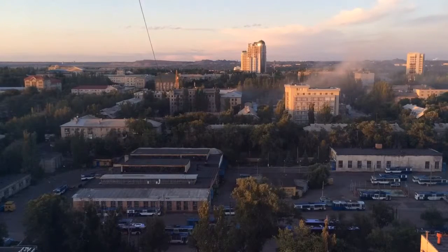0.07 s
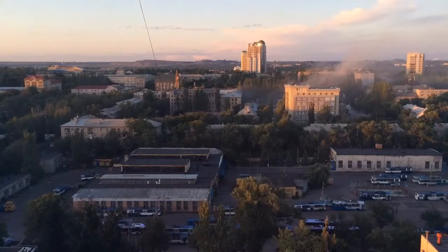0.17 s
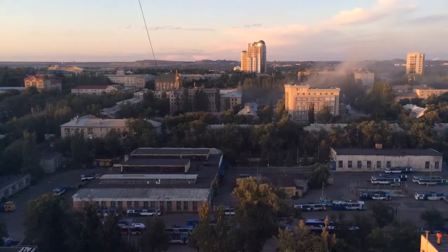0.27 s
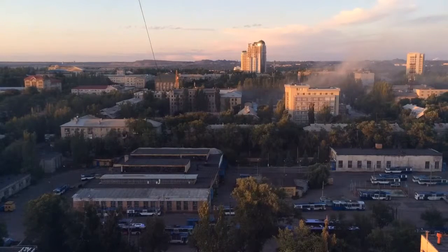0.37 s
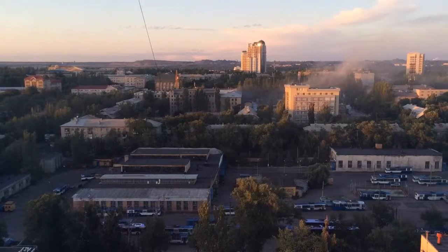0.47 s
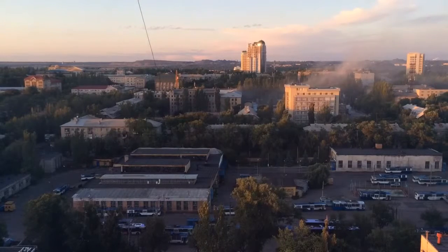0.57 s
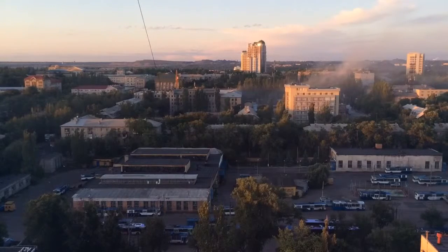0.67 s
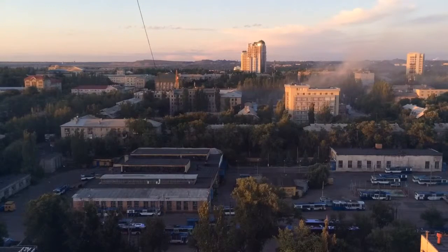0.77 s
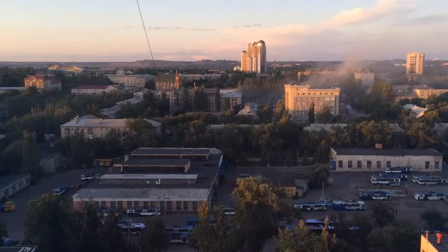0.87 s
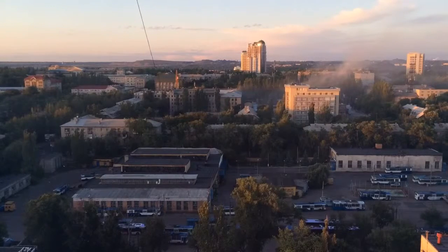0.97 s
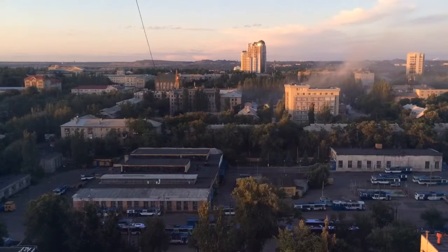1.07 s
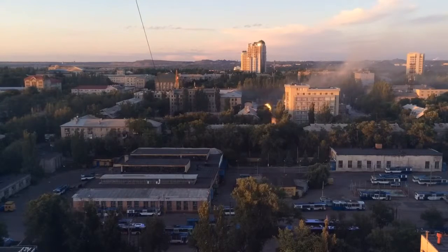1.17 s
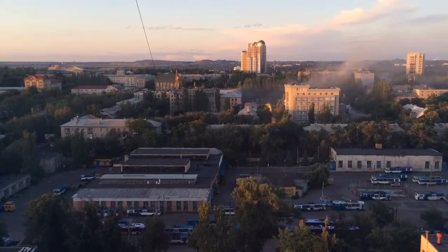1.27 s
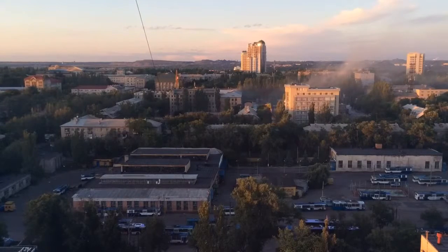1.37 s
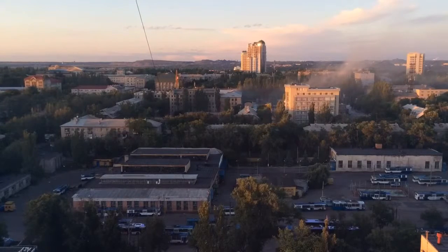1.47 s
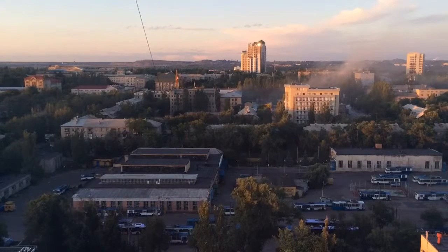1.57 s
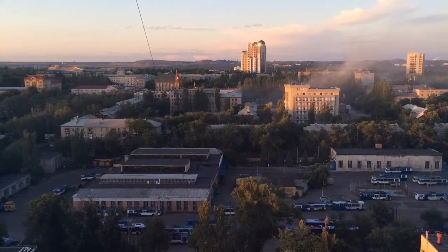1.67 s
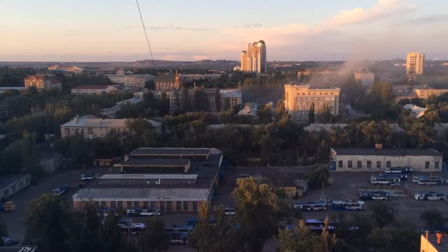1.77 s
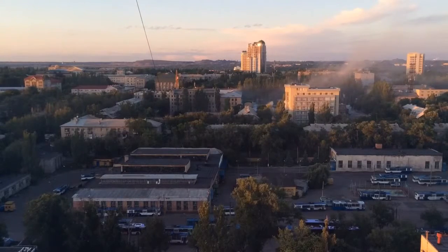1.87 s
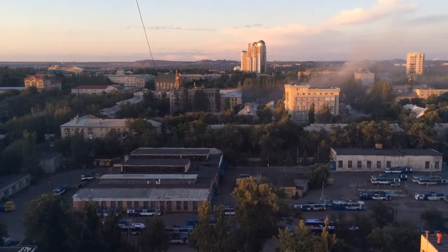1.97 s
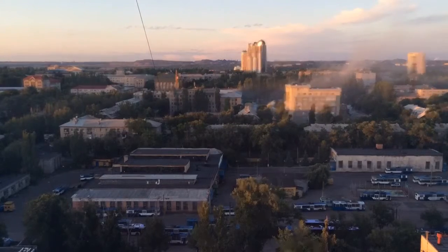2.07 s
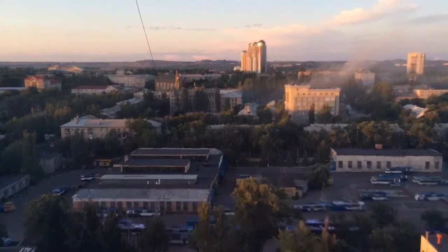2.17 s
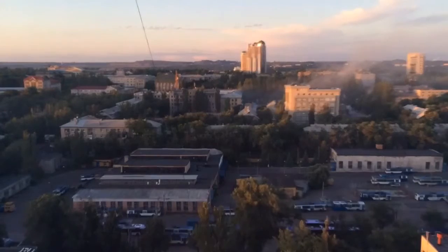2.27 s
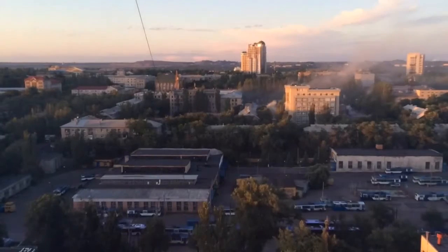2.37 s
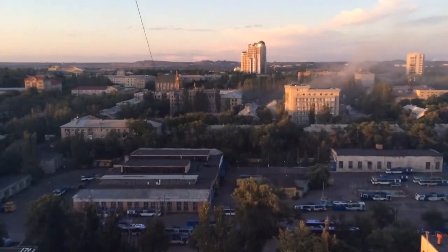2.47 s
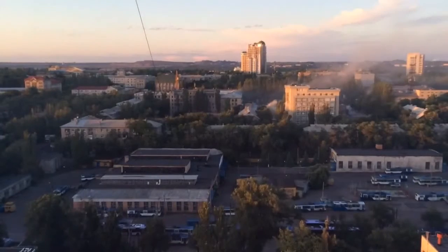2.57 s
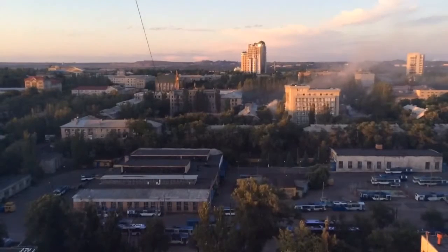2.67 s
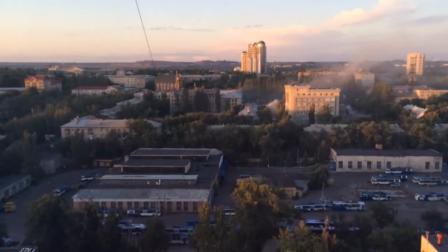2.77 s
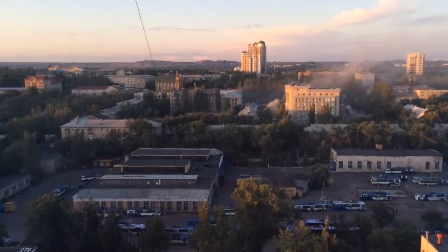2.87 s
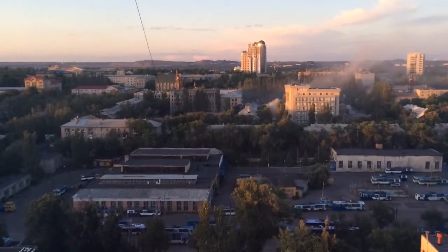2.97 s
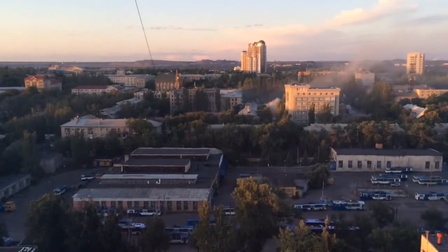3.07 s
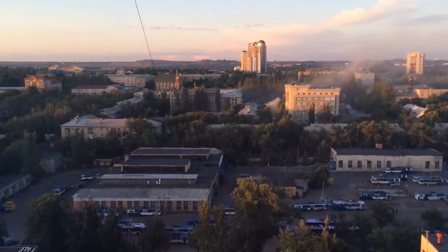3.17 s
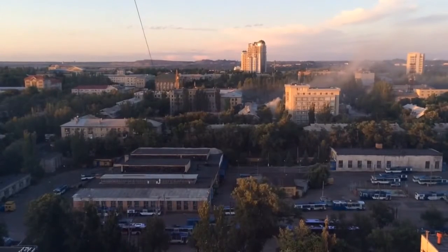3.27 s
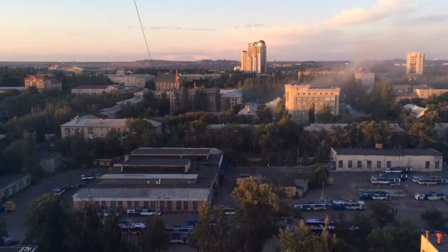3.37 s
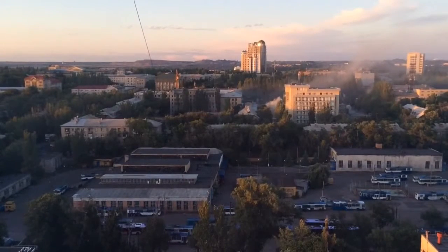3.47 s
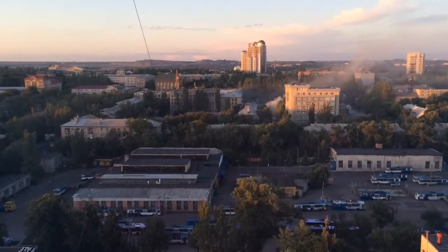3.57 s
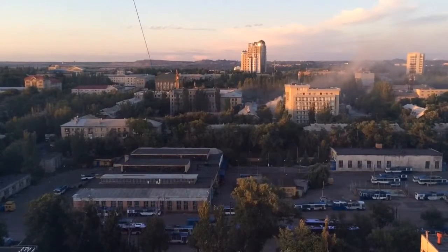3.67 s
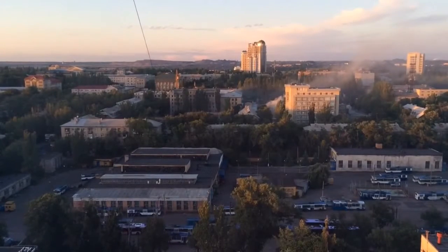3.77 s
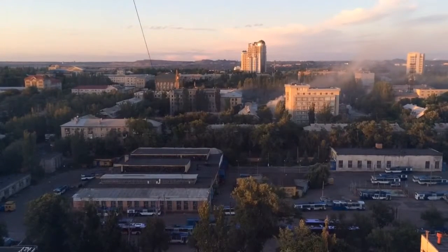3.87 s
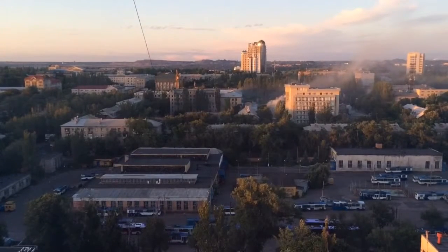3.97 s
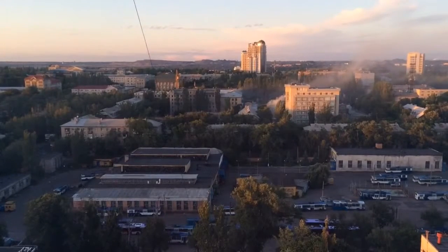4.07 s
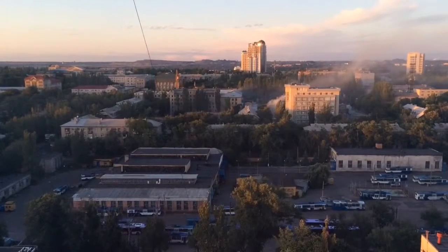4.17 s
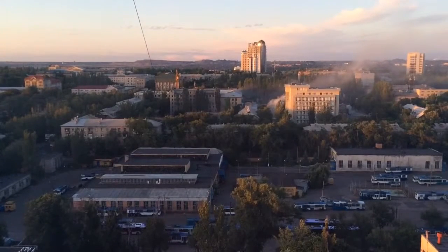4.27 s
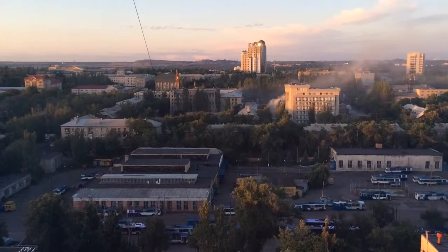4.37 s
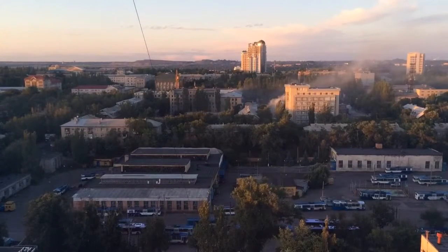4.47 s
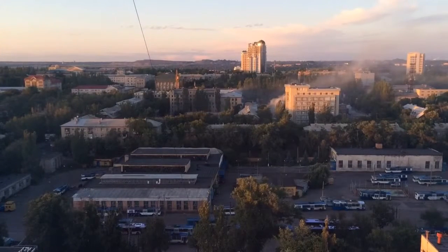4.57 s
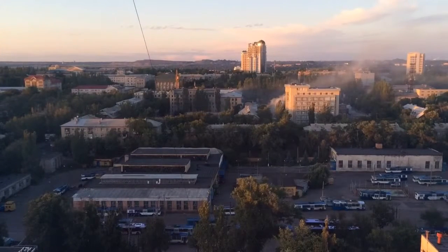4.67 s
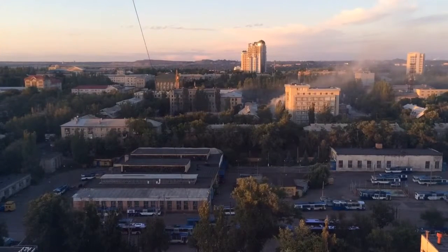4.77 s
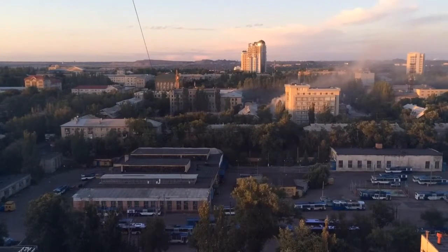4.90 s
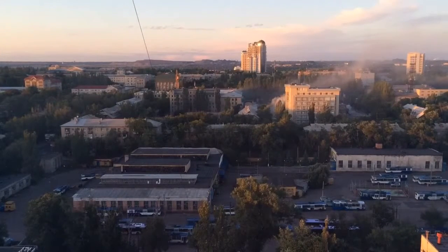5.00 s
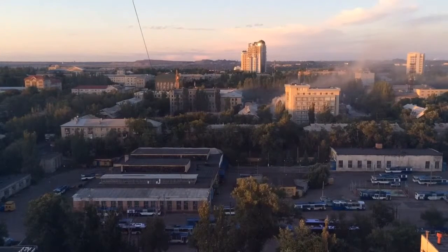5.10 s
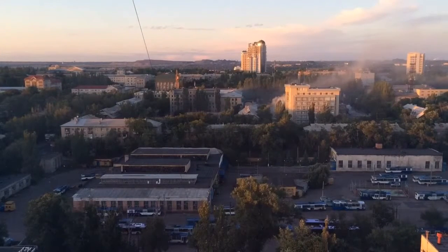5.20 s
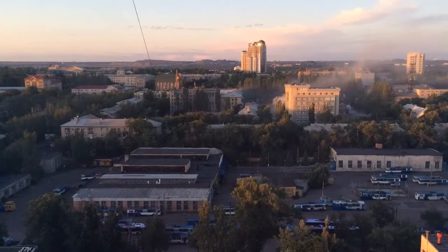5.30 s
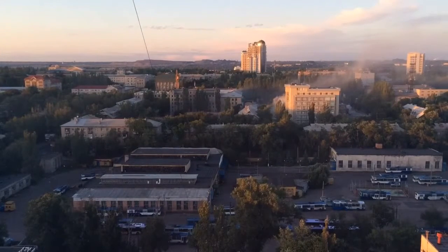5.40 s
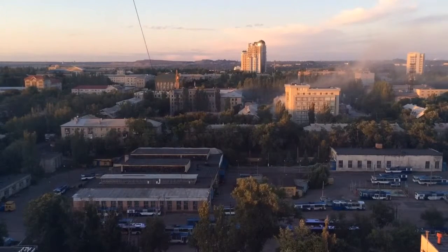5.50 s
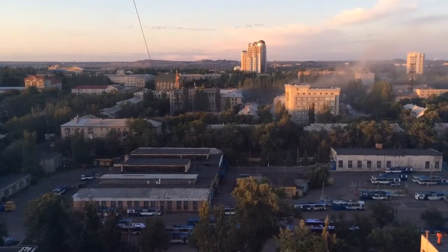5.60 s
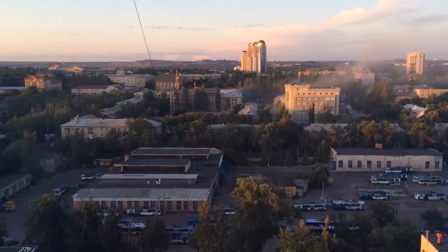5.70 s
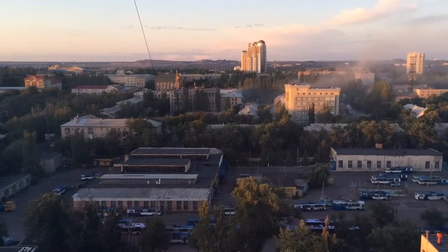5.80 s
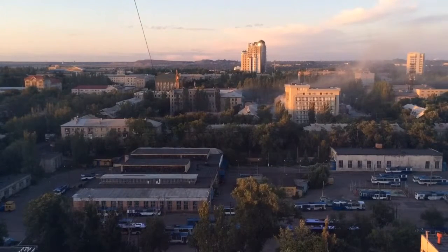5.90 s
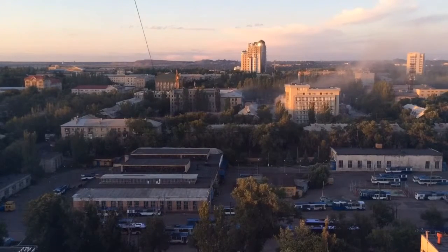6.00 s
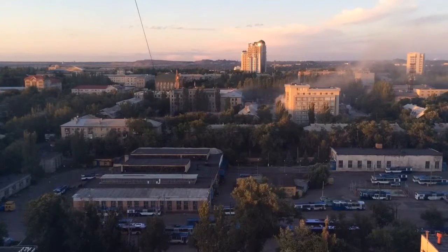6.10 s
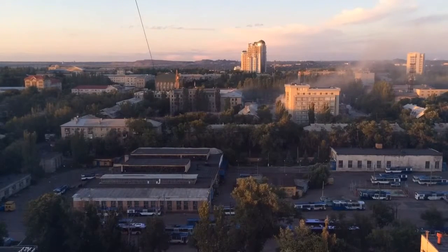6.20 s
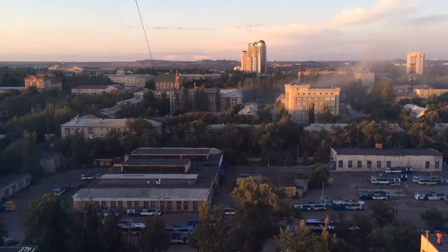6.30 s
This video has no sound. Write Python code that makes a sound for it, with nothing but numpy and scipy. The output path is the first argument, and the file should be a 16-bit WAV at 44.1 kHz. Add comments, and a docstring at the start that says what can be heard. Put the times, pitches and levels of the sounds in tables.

```python
"""A whistling, fluttering rush over faint city hum: a shell's turbulent wake, heard from a high open window. At
2.1 s the shell bursts some hundred metres away and the blast rattles the window frame. Countless walls return
it as a long roll, with a few duller bangs in it; the room rings along. Two sharp overload ticks sound in the
loud part of the roll, then three small clicks in the room."""
import sys
import numpy as np
from scipy import signal
from scipy.fft import rfft, irfft, next_fast_len
from scipy.io import wavfile
from scipy.ndimage import uniform_filter1d, minimum_filter1d

SR = 44100
rng = np.random.default_rng(int(sys.argv[2]) if len(sys.argv) > 2 else 0)


def generate_wav(signal):
    """Clip the signal to [-1, 1] and save it as 16-bit WAV at the path in sys.argv[1]."""
    frames = np.transpose(np.atleast_2d(signal))
    scaled = np.clip(frames, -1, 1) * 32767
    pcm = np.round(scaled).astype(np.int16)
    wavfile.write(sys.argv[1], SR, pcm)


N = 279750
TIME_S = np.arange(N) / SR
FRAME_S = np.arange(N // 128 + 6) * 128 / SR
BIN_HZ = np.fft.rfftfreq(512, 1 / SR)
BLAST_S = 2.099

# shell's flight, nearest as it passes: time_s, level_db, treble_db
FLIGHT = [(0, -46, -29), (.24, -52.5, -24.5), (.7, -44, -20.5), (1.15, -31.7, -12), (1.24, -34.5, -19),
          (1.34, -37.5, -21), (1.62, -37.5, -20), (2.08, -34.5, -21.5)]
# gusts in its wake: crest_s, fall_s, lift_db, treble_lift_db, whistle_lift_db
GUSTS = [(.148, 0.035, 7.5, 6, 9), (.365, 0.09, 9.5, -1, 7), (.5, 0.094, 6.5, -5, -2.5),
         (.716, 0.036, 5, 1.5, -8), (.861, 0.064, 6.5, -4.5, -1), (1.0, 0.031, 2.5, -5, 6),
         (1.211, 0.018, 10, 11, 14), (1.257, 0.02, 5, 9, 6), (1.303, .014, 2, 8.5, 8),
         (1.41, 0.038, 8.5, 1, 3), (1.72, .06, 1.5, 4.5, 5), (1.895, 0.039, 7.5, -1, -1)]
# city hum: pitch_hz, level_db
HUM_TONES = [(80.7, -63.5), (129.2, -68), (247.6, -62.5)]
# low rumble ahead of the blast: time_s, level_db
RUMBLE_LEVELS = [(0, -65), (.7, -60.5), (.95, -51), (1.2, -60), (1.5, -58), (1.65, -49.5), (1.9, -46.5),
                 (2.1, -45.5)]
# direct blast, then echoes off blocks of buildings:
# peak_s, level_db, half_length_s, bass_offset_db, treble_offset_db, deep_offset_db
STRONG_ECHOES = [(2.133, -9.5, 0.031, -2.5, 10, -29), (2.286, -11.5, .062, -1.5, 14, -10),
                 (2.508, -13.5, 0.03, -3, 7.5, -22.5), (2.628, -12.5, 0.14, 0, 9, -16),
                 (2.99, -12.5, 0.11, -12, 2, -17), (3.103, -13.5, 0.075, -3, 8.5, -17.5),
                 (3.424, -22.5, 0.13, 3, 0, -13.5), (3.892, -20, 0.14, 0, -1.5, -13),
                 (4.216, -20, 0.083, 0.5, -9, -21.5), (4.624, -36, 0.13, 2, 14, -12.5),
                 (4.915, -22, 0.16, 2.5, -5, -16), (5.433, -14.5, 0.083, -4, 3, -19),
                 (6.257, -36.5, 0.045, 0, -5, -1.5)]
# waves shaking the window: start_s, level_db, hold_s
SHAKES = [(2.1, -30.5, 0.065), (2.195, -25, 0.078)]
# pressure waves that stand out: start_s, level_db, pitch_hz, rise_s
BANGS = [(2.101, -6, 340, 0.0033), (2.191, -8, 148, 0.0085), (3.041, -9, 146.7, 0.024),
         (3.174, -13.5, 135, 0.02), (4.201, -19, 130, 0.016), (4.89, -11.5, 140.4, 0.024),
         (5.416, -17, 182, 0.0094)]
# two overload ticks, then three small room clicks: start_s, level_db, ring_hz, decay_s, tail_offset_db
TICKS_AND_CLICKS = [(2.525, -35, 7000, .0015, -18), (3.04, -33, 6000, 0.0015, -13.5),
                    (5.901, -47, 8800, 0.0047, 7.5), (6.111, -54.5, 11500, .004, 7),
                    (6.22, -44, 11100, .012, 8.5)]

# source spectra: frequency_hz, relative_density_db
WAKE_SPECTRUM = [(150, -37), (330, -18.5), (650, -6.5), (1000, 0), (2000, -3), (2700, -4), (3300, -8.5),
                 (3800, -15), (4900, -20), (6000, -33), (7000, -46), (9000, -56), (14000, -73)]
CITY_SPECTRUM = [(20, -21.5), (50, -15.5), (80, -1), (140, -10.5), (300, 1.5), (900, 3.5), (2500, -17),
                 (5000, -26), (8000, -34), (15000, -34.5)]
RUMBLE_SPECTRUM = [(20, -47), (60, -27), (100, -16), (135, -4), (190, -2.5), (260, -15), (400, -14),
                   (900, -32), (4000, -75)]
ECHO_SPECTRUM = [(20, -38), (55, -32), (85, -20), (105, -10), (140, -1.5), (270, -1), (560, 2), (850, -4),
                 (1350, -4), (1800, -11.5), (2600, -20), (4000, -37), (5200, -52), (6500, -66),
                 (9000, -78.5), (15000, -93.5)]
DEEP_SPECTRUM = [(10, -22), (25, -18.5), (40, -9), (55, -2), (80, -5), (110, 0), (200, -47), (600, -82)]
RATTLE_SPECTRUM = [(500, -8), (2000, 2), (4000, 11), (6000, 0), (9000, -2), (12000, -3.5), (15500, -11)]
CLICK_SPECTRUM = [(60, 9), (300, 19), (1500, 20.5), (3200, 16.5), (5000, -3), (9000, -4.5), (15500, -6.5)]

# room's standing waves: centre_hz, width_hz, lift_db (at depth 1)
ROOM_MODES = [(54, 20, 12), (80, 10, 11), (104, 12, 12), (129, 10, 14), (146, 28, 9), (165, 9, 6),
              (207, 45, 5), (329, 16, 8), (363, 12, 10), (490, 20, 3), (538, 13, 9.5), (617, 10, 7),
              (630, 9, 10), (706, 40, 3), (742, 19, 7), (873, 22, 4), (934, 25, 4), (1055, 26, 6),
              (1172, 10, 10), (1268, 45, 3), (1416, 12, 5), (1454, 11, 8), (1571, 11, 4), (1810, 35, 4),
              (2518, 45, 3)]
# room's diffuse decay: frequency_hz, t60_s
ROOM_DECAY = [(200, 0.077), (4000, 1), (9000, 0.58), (15000, 0.06)]


def gain_of(db):
    """Decibels to amplitude."""
    return 10 ** (np.asarray(db) / 20)


def unit_rms(x):
    """Scales to rms 1."""
    return x / np.sqrt(np.mean(x ** 2) + 1e-20)


def at_hz(table, hz):
    """Interpolates on a log-frequency axis."""
    knots_hz, values = np.transpose(table)
    return np.interp(np.log(hz + 1), np.log(knots_hz + 1), values)


def at_time(table, time_s):
    """Interpolates each column over time."""
    knots_s, *columns = np.transpose(table)
    return [np.interp(time_s, knots_s, column) for column in columns]


def resonance(hz, centre_hz, width_hz):
    """Bell curve of height 1."""
    return 1 / (1 + (2 * (hz - centre_hz) / width_hz) ** 2)


def filtered(x, db_at_hz, size=16384):
    """Minimum-phase filter with the given gain curve."""
    log_gain = np.log(gain_of(db_at_hz(abs(np.fft.fftfreq(size, 1 / SR)))))
    response = np.fft.ifft(np.exp(np.conj(signal.hilbert(log_gain)))).real
    return signal.oaconvolve(x, response[:size // 2])[:N]


def coloured(x, spectrum):
    """Filters by a spectrum table, to rms 1."""
    return unit_rms(filtered(x, lambda hz: at_hz(spectrum, hz)))


def shocks(per_s, spread_db):
    """Random pressure impulses, a few much larger than the rest."""
    size = gain_of(spread_db * np.minimum(rng.exponential(1, N), 4))
    return size * rng.choice([-1., 1.], N) * (rng.random(N) < per_s / SR)


def random_field(frames, bins):
    """Noise smoothed over time and frequency, rms 1."""
    field = rng.standard_normal((len(FRAME_S), len(BIN_HZ)))
    field = uniform_filter1d(field, frames, axis=0)
    return unit_rms(uniform_filter1d(field, bins, axis=1, mode="wrap"))


def steered(x, field_db):
    """Applies a gain that varies over time and frequency."""
    spectra = signal.stft(x, nperseg=512, noverlap=384)[2]
    gain = gain_of(field_db[:spectra.shape[1]].T)
    return signal.istft(spectra * gain, nperseg=512, noverlap=384)[1][:N]


def standing_waves(x, depth):
    """The room rings at its own pitches; output at rms 1."""
    def lift_db(hz):
        return depth * sum(db * resonance(hz, centre, width) for centre, width, db in ROOM_MODES)
    return unit_rms(filtered(x, lift_db))


def room_tail(x, direct_db, diffuse_hz=1300):
    """Diffuse reverberation above the standing waves; longest in the low treble."""
    bands_hz, age_s, spectra = signal.stft(rng.standard_normal(SR), SR, nperseg=256)
    decay = gain_of(-60 * age_s / at_hz(ROOM_DECAY, bands_hz)[:, None])
    tail = signal.istft(spectra * decay, SR)[1]
    size = next_fast_len(N + SR)
    hz = np.fft.rfftfreq(size, 1 / SR)
    wet_share = hz ** 4 / (hz ** 4 + diffuse_hz ** 4) / (1 + gain_of(direct_db) ** 2)
    room = np.sqrt(1 - wet_share) + np.sqrt(wet_share) * rfft(tail / np.linalg.norm(tail), size)
    return irfft(rfft(x, size) * room, size)[:N]


def shell(whistle_hz=2610, sag_hz_per_s=460, whistle_fade_s=0.37, flutter_db=0.9, patchy_db=2.0):
    """The turbulent wake whistles, flutters, swells and brightens; the blast cuts it off."""
    t = FRAME_S[:, None]
    level_db, treble_db = at_time(FLIGHT, t)
    gust_db, gust_treble_db, gust_whistle_db = gusts(t)
    air_weight = np.clip((BIN_HZ - 2200) / 2600, 0, 1.2)  # air absorbs more at higher frequency
    tilt_db = (treble_db + gust_treble_db + 17) * air_weight  # flat at a treble of -17 dB
    pitch_hz = whistle_hz - sag_hz_per_s * t
    whistle_band = np.exp(-((BIN_HZ - pitch_hz) / 253.3) ** 2) - .3  # draws on the rush around it
    whistle_db = (11 * np.exp(-t / whistle_fade_s) + gust_whistle_db) * whistle_band
    field_db = level_db + gust_db + tilt_db + whistle_db
    field_db += flutter_db * random_field(frames=5, bins=200)
    field_db += patchy_db * random_field(frames=12, bins=6)
    wake = coloured(shocks(per_s=6000, spread_db=2.9), WAKE_SPECTRUM)
    wake = standing_waves(room_tail(wake, direct_db=2.0), depth=0.17)
    return steered(wake, field_db) * np.interp(TIME_S, [2.1, 2.16], [1, 0])


def gusts(t, rise_to_fall=0.54):
    """Gusts rise fast and fall slower; returns level, treble and whistle lifts in dB."""
    crest_s, fall_s, *lifts_db = np.transpose(GUSTS)
    width_s = fall_s * np.where(t < crest_s, rise_to_fall, 1)
    swell = 1 / (1 + ((t - crest_s) / width_s) ** 2)
    return [swell @ lift_db[:, None] for lift_db in lifts_db]


def city(wash_db=-55, waver_rad=0.32):
    """Steady wash, wavering hum and a low rumble that grows before the blast."""
    wash = standing_waves(coloured(rng.standard_normal(N), CITY_SPECTRUM), depth=0.21)
    hum = np.zeros(N)
    for pitch_hz, level_db in HUM_TONES:
        drift_rad = waver_rad * np.interp(TIME_S, FRAME_S, random_field(frames=80, bins=1)[:, 0])
        hum += gain_of(level_db) * unit_rms(np.sin(2 * np.pi * pitch_hz * TIME_S + drift_rad))
    rumble = standing_waves(coloured(rng.standard_normal(N), RUMBLE_SPECTRUM), depth=0.71)
    rumble_db = at_time(RUMBLE_LEVELS, TIME_S)[0]
    return hum + gain_of(wash_db) * wash + gain_of(rumble_db) * rumble


def blast_roll(flicker_db=0.66, patchy_db=1.12, echo_gain_db=1):
    """Thousands of wall reflections of the blast merge into a roll over deep bass."""
    field_db, deep_gain = reflections()
    field_db += flicker_db * random_field(frames=7, bins=200)
    field_db += patchy_db * random_field(frames=16, bins=5)
    echoes = coloured(shocks(per_s=4500, spread_db=3.04), ECHO_SPECTRUM)
    echoes = standing_waves(room_tail(echoes, direct_db=6.4), depth=0.89)
    deep = standing_waves(coloured(shocks(per_s=980, spread_db=1.1), DEEP_SPECTRUM), depth=0.7)
    front = np.interp(TIME_S - BLAST_S, [0, .006, .012], [0, .2, 1])
    return (gain_of(echo_gain_db) * steered(echoes, field_db) + deep_gain * deep) * front


def reflections(build_s=0.11, hold_s=0.48, fall_db_per_decade=23.5, dulling_s=0.48,
                bass_lag_s=0.8, deep_lag_s=0.12, air_db_per_s=2.84):
    """Power-law decay plus strong echoes; returns the roll's dB field and the deep bass gain."""
    t = FRAME_S[:, None]
    age_s = np.maximum(t - BLAST_S, 0)
    bass_weight = 1 / (1 + (BIN_HZ / 220) ** 6)
    treble_weight = np.clip((BIN_HZ - 1000) / 1900, 0, 1.9)
    roll_db = -11 - fall_db_per_decade * np.log10(np.hypot(1, age_s / hold_s))
    bending_db = (-0.6 - 0.9 * np.exp(-age_s / bass_lag_s)) * bass_weight  # bass rounds buildings late
    tilt_db = (2 + 11.5 * np.exp(-age_s / dulling_s)) * treble_weight  # longer paths are duller
    power = gain_of(roll_db + bending_db + tilt_db) ** 2 * (1 - np.exp(-age_s / build_s))
    deep_power = (gain_of(roll_db - 14) * (1 - np.exp(-age_s / deep_lag_s))) ** 2
    for peak_s, level_db, half_length_s, bass_db, treble_db, deep_db in STRONG_ECHOES:
        swell = 1 / (1 + ((t - peak_s) / half_length_s) ** 2) ** 2
        absorbed_db = air_db_per_s * (peak_s - BLAST_S) * (BIN_HZ / 4000) ** 2
        echo_db = level_db + bass_db * bass_weight + treble_db * treble_weight - absorbed_db
        power += swell * gain_of(echo_db) ** 2
        deep_power += swell * gain_of(level_db + deep_db) ** 2
    return 10 * np.log10(power), np.interp(TIME_S, FRAME_S, np.sqrt(deep_power[:, 0]))


def window_rattle(attack_s=0.011, fall_db_per_s=100, top_t60_s=0.7):
    """Pressure waves shake the frame and loose things into dense tiny impacts; the top dies first."""
    shaking = np.zeros(N)
    for start_s, level_db, hold_s in SHAKES:
        attack = np.clip((TIME_S - start_s) / attack_s, 0, 1)
        fall_db = fall_db_per_s * np.maximum(TIME_S - start_s - hold_s, 0)
        shaking = np.hypot(shaking, attack * gain_of(level_db - fall_db))
    impacts = coloured(shocks(per_s=7600, spread_db=0.89), RATTLE_SPECTRUM)
    dulling_db = -60 * np.maximum(FRAME_S[:, None] - 2.3, 0) / top_t60_s * (BIN_HZ / BIN_HZ[-1]) ** 2
    return steered(room_tail(impacts, direct_db=0.89) * shaking, dulling_db)


def bangs(overtone_db=-11, grit_rms=0.054):
    """Each strong wave swings the air at the window for a few steep, slightly ragged cycles."""
    out = np.zeros(N)
    for start_s, level_db, pitch_hz, rise_s in BANGS:
        age_s = np.maximum(TIME_S - start_s, 0)
        phase = 2 * np.pi * pitch_hz * age_s
        grit = grit_rms * coloured(rng.standard_normal(N), ECHO_SPECTRUM)
        swing = np.sin(phase) + gain_of(overtone_db) * np.sin(2 * phase) + grit
        envelope = age_s / rise_s * np.exp(.5 - .5 * (age_s / rise_s) ** 2)
        out += gain_of(level_db) * swing * envelope
    return out


def ticks_and_clicks(ring_db=7, width_hz=2200, tail_t60_s=0.56):
    """Two sharp overload ticks, then three small room clicks: timed noise bursts with fading tails."""
    out = np.zeros(N)
    for start_s, level_db, ring_hz, decay_s, tail_db in TICKS_AND_CLICKS:
        age_s = np.maximum(TIME_S - start_s, 0)
        tail = gain_of(tail_db - 60 * age_s / tail_t60_s)
        envelope = (TIME_S > start_s) * np.hypot(np.exp(-age_s / decay_s), tail)

        def colour_db(hz):
            return at_hz(CLICK_SPECTRUM, hz) + ring_db * resonance(hz, ring_hz, width_hz)
        grit = unit_rms(filtered(rng.standard_normal(N), colour_db))
        out += gain_of(level_db) * grit * envelope
    return out


def scene():
    """Mono sum at the window."""
    return (shell() + city() + blast_roll() + window_rattle() + bangs() + ticks_and_clicks())[None]


def record(dry):
    """A fast limiter holds the blast under full scale; a low-pass follows."""
    needed_gain = np.minimum(1, .97 / (abs(dry) + 1e-9))
    held_gain = minimum_filter1d(needed_gain, size=181)
    smooth_gain = uniform_filter1d(uniform_filter1d(held_gain, size=91), size=91)
    low_pass = signal.firwin(511, cutoff=15550, window=("kaiser", 9), fs=SR)
    return signal.oaconvolve(dry * smooth_gain, low_pass[None], "same")


dry = scene()
out = record(dry)
generate_wav(out)
```